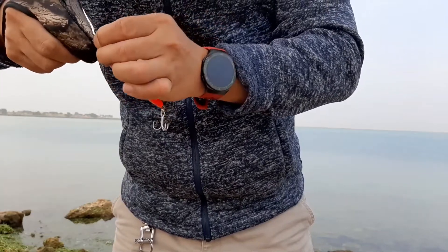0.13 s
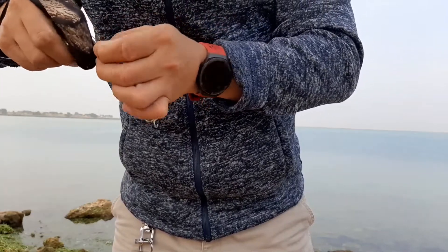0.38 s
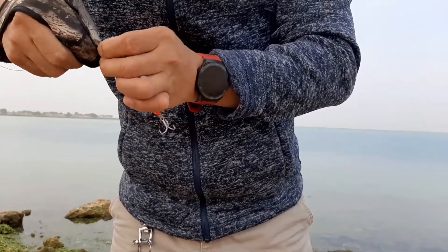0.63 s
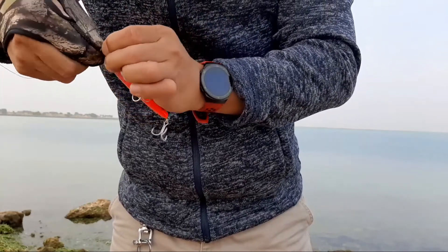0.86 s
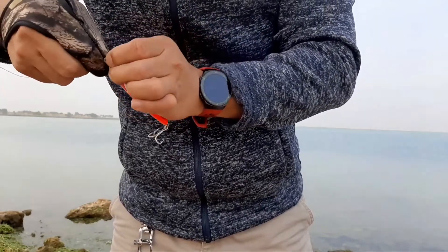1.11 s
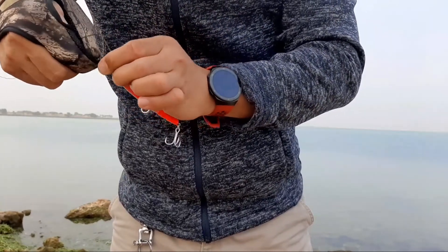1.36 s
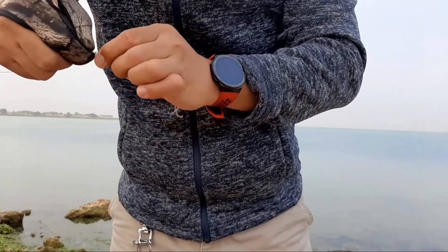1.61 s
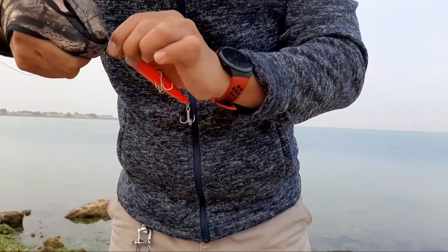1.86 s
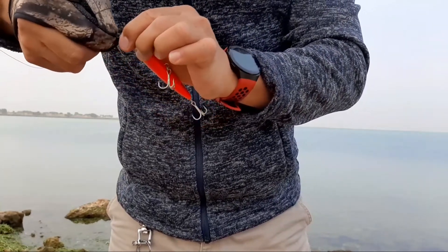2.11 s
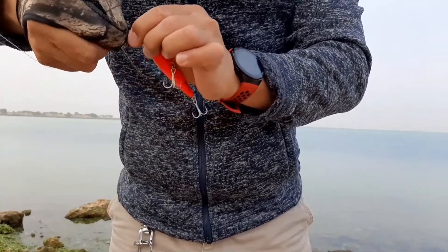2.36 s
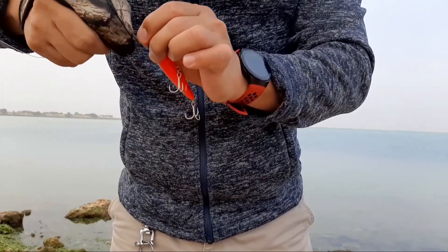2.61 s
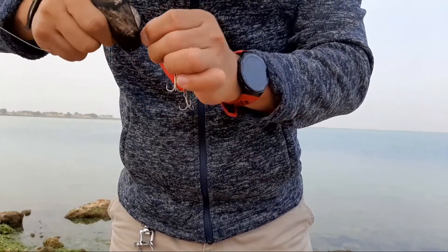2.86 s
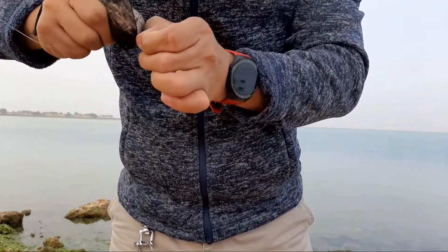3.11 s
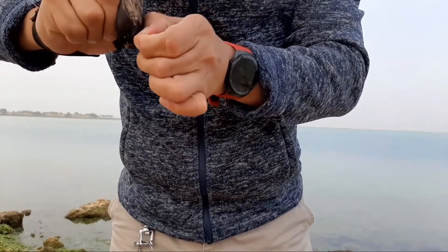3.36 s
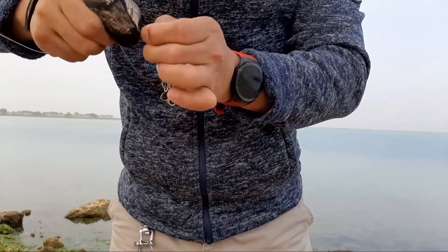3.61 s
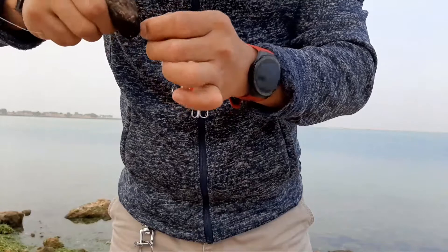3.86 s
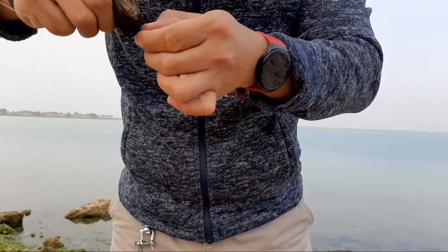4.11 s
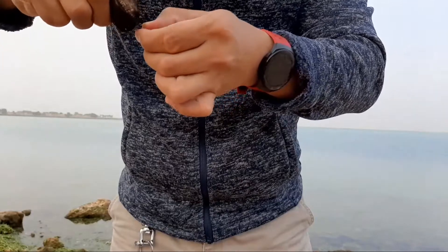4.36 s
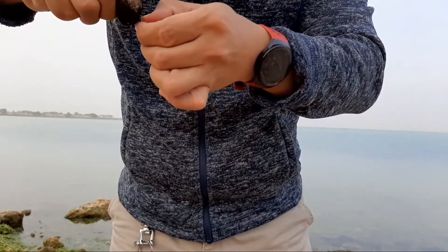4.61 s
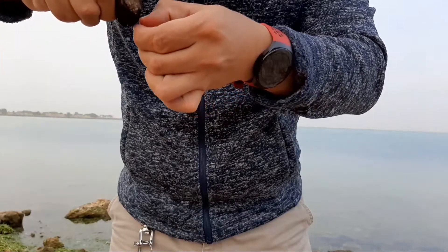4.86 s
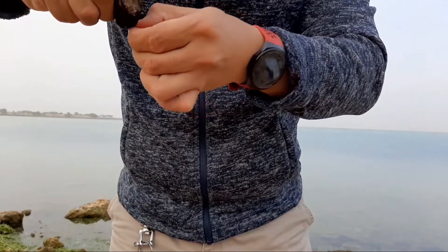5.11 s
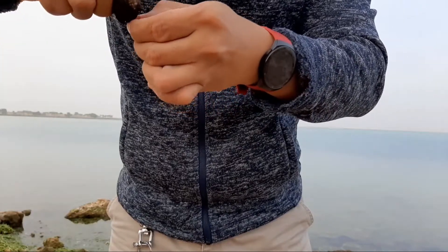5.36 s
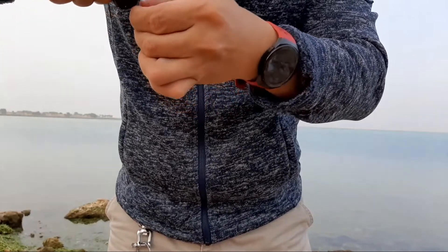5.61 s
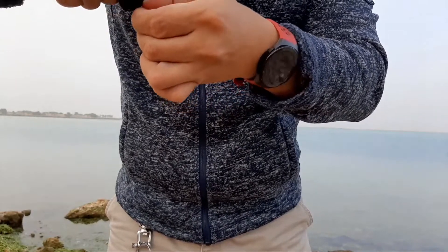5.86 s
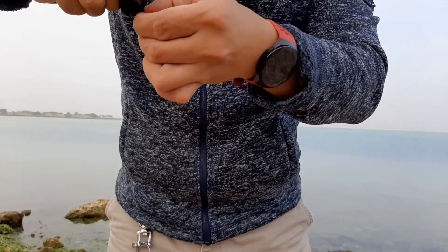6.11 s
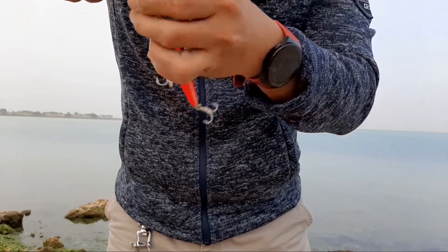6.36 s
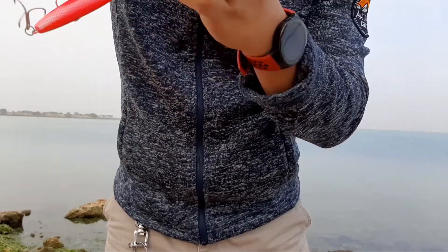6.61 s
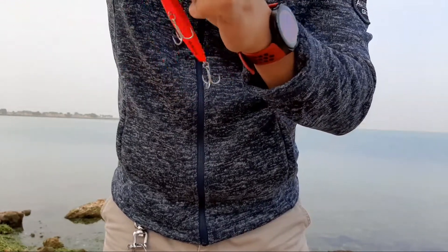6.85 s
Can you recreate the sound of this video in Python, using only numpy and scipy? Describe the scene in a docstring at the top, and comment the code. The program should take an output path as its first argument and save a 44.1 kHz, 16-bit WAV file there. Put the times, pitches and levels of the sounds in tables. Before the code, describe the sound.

An open, quiet shore in stereo, with light steady hiss. At 0 s the tail of a crow's caw ends amid low wind thumps, which continue to about 0.7 s. Raspy, fluttering caws of about 0.3 s follow from the left at 0.5, 1.4, 2.3 and 3.2 s, with a faint short echo; after a gap, duller, quieter ones come at 5.1 and 5.9 s. A distant boat engine hums low, more noticeable after 2.3 s. Close hands on a fishing lure make small bright ticks, clustered around 0.9-1.05 and 1.5-1.9 s, with soft rubs at 0.7 and 1.35. A sharp plastic knock and tick land at 2.95, a crisp double tick at 3.8, and a duller knock at 6.1. From 6.35 to the end near 7 s, metal hooks rattle and scrape brightly, with the strongest wind thump at 6.6.

```python
"""Wind thumping the microphone ports and the tail of a crow's caw come first; six more caws follow from the left.
The voice is a fluttering pulse train through throat resonances, with a faint diffuse echo from the shore.
Puffs are damped swings, mostly in one port, over lumpy rumble; a far boat engine drones as a harmonic series.
Close by, two hands fiddle with a fishing lure: noise impulses ring the hooks as ticks, band noise makes soft rubs,
and dense grains make the final rattle. Steady hiss lies under all."""
import sys
import numpy as np
from scipy import signal
from scipy.fft import rfft, irfft
from scipy.io import wavfile
from scipy.ndimage import uniform_filter1d

SR = 44100
rng = np.random.default_rng(int(sys.argv[2]) if len(sys.argv) > 2 else 0)


def level_to_linear(level):
    """Convert decibel levels to linear amplitude factors, elementwise."""
    exponent = np.asarray(level, float) / 20
    return 10 ** exponent


def persist_wave(psi):
    """Save psi, clipped to +-1, as 16-bit WAV."""
    counts = np.round(np.clip(psi, -1, 1) * 32767).astype(np.int16)
    wavfile.write(sys.argv[1], SR, np.atleast_2d(counts).T)


N = 307818  # length in samples


def evened(x):
    """Power normalisation: scales to rms 1."""
    return x / np.sqrt(np.mean(x ** 2) + 1e-20)


def curve(rows):
    """Linear interpolation: every column after t/s, sample by sample."""
    s, *columns = np.transpose(rows)
    return [np.interp(np.arange(N) / SR, s, c) for c in columns]


def coloured(x, points):
    """Spectral shaping: filters by (f/Hz, level/dB) points joined over log frequency, then rms 1."""
    f, db = np.transpose(points)
    hz = np.fft.rfftfreq(x.shape[-1], 1 / SR)
    gain = level_to_linear(np.interp(np.log(hz + 1), np.log(f), db))
    return evened(irfft(rfft(x) * gain, x.shape[-1]))


def slow(hz, channels=1):
    """Band-limited random modulation: smooth chance up to about hz, rms 1."""
    return coloured(rng.standard_normal((channels, N)), [(hz, 0), (2 * hz, -30), (20 * hz, -120)])


def resonate(x, hz, width):
    """Heterodyned one-pole resonance: near unit gain at a centre that follows the curve hz."""
    turn = np.exp(2j * np.pi * np.cumsum(hz) / SR)
    r = np.exp(-np.pi * width / SR)
    return 2 * (turn * signal.lfilter([1 - r], [1, -r], x / turn)).real


def add(mix, s, sound, pan_db=0., right_lag=0):
    """Stereo localisation: adds a sound at s seconds with a level and a time difference between the ports."""
    for port, (db, lag) in enumerate([(pan_db / 2, 0), (-pan_db / 2, right_lag)]):
        at = round(s * SR) + lag
        part = mix[port, max(at, 0):max(at + len(sound), 0)]
        part += level_to_linear(db) * sound[max(-at, 0):][:len(part)]


# the caws: start t/s, end t/s, relative level/dB, f/Hz at full effort before flutter and sag,
# time scale of the swell/share of the caw, treble level/dB
CAWS = [(-.22, 0.073, -51, 968, .11, -1), (0.506, 0.802, -51, 1051, 0.18, 2.5),
        (1.415, 1.716, -52.5, 1083, .14, 0.7), (2.306, 2.589, -50, 1011, 0.092, 3),
        (3.24, 3.559, -51.5, 1037, .08, -1), (5.099, 5.384, -56, 1008, 0.13, -6),
        (5.908, 6.209, -54, 1020, 0.16, -1.5)]
# resonances of throat and open beak before the beak moves: f/Hz, width/Hz of each of two stages in series,
# level/dB, left minus right level/dB
THROAT = [(830, 930, -60, 7), (1373, 544, 12, 5), (1977, 420, 12.5, 2.5), (3250, 950, -15, 9),
          (3810, 363, -3, 7.5), (5940, 1070, -7, 12), (10700, 500, -36, -26)]


def crow(throb_db=7.5):
    """Source-filter voice: pulses near 1 kHz, pulled flat some 80 times a second into harsh sidebands."""
    ends_db, sink = -18.5, .11  # effort at the ends; time scale of its sinking as a share of the caw
    pitch_per_db, sag, sag_delay = .017, .15, 18.  # shares of pitch; the slower the swell, the later the sag
    flutter_per_s, flutter_slows, flutter_spread = 85., .06, .02  # at the start; share lost by the end; per caw
    flutter_depth, depth_fade = .3, 3.  # share of the pitch; how late the flutter dies away
    jitter, breath, uneven = .011, .36, .55  # pitch tremor, share of air noise, strong-weak contrast
    out, wobble = np.zeros((2, N)), slow(220, channels=3)
    for (start, end, db, pitch_hz, swell, treble_db), (odd,) in zip(CAWS, rng.standard_normal((len(CAWS), 1))):
        share = np.linspace(0, 1, round((end - start) * SR))
        effort_db = ends_db * (np.exp(-share / swell) + np.exp((share - 1) / sink))
        weak = 1 - effort_db / 6  # the voice turns ragged where it is weak
        rough_pitch, rough_flutter, rough_level = wobble[:, round(end * SR):][:, :len(share)]

        per_s = flutter_per_s * (1 - flutter_slows * share + flutter_spread * odd)
        flutter = 2 * np.pi * (np.cumsum(per_s * (1 + 2 * jitter * rough_flutter)) / SR + rng.random())
        dip = (.5 - .5 * np.cos(flutter)) ** 1.3  # the pitch lingers at the top
        depth = flutter_depth * level_to_linear(.5 * effort_db) * (1.1 - share ** depth_fade)
        top_hz = pitch_hz * (1 - sag * share ** (sag_delay * swell) + pitch_per_db * effort_db)
        turns = np.cumsum(top_hz * (1 - depth * dip + jitter * weak * rough_pitch)) / SR

        folds = sum(np.cos(2 * np.pi * k * turns) for k in range(1, 12))
        # alternate pulses differ most at first: lines at half the pitch
        folds *= 1.5 + uneven * (1 - share) * (2.5 + 1.2 * rough_level) * np.cos(np.pi * turns)
        puffs = (0.26 + np.exp(-(turns % 1) / 0.19)) * rng.standard_normal(len(share))
        voice = evened(folds) + breath * np.sqrt(weak) * evened(puffs)
        drive = voice * level_to_linear(throb_db / 2 * np.cos(flutter - .6))

        opening_db = 9.5 * (np.minimum(2 * share, 1) - .8)  # the band near 3.7 kHz grows as the beak opens
        beak = (top_hz / top_hz.max()) ** 0.11 * (1 + 0.055 * share)  # opens with pitch, widens with time
        parts = []
        for k, (hz, width, gain_db, _) in enumerate(THROAT):
            band = resonate(resonate(drive, hz * beak, width), hz * beak, width)
            band_db = gain_db + treble_db * (hz > 3300) + opening_db * (3300 < hz < 4500)
            parts.append((-1) ** k * level_to_linear(band_db) * band)
        # effort sets the loudness at any pitch
        loud = np.sqrt(uniform_filter1d(sum(parts) ** 2, size=1600) + 1e-9)
        level = level_to_linear(db + 3.0 + effort_db) / loud * signal.windows.tukey(len(share), .2)
        for part, (*_, pan_db) in zip(parts, THROAT):
            add(out, start, level * part, pan_db, right_lag=18)
    return out


def shore(x):
    """Diffuse reflection: rocks and water return a short decaying tail, different in each port."""
    t = np.arange(SR // 4) / SR
    tail = rng.standard_normal((2, len(t))) * level_to_linear(-60 * t / .3) * (t > .006)
    return signal.oaconvolve(x.mean(0)[None], tail / np.linalg.norm(tail[0]), axes=1)[:, :N]


# strong puffs of wind: t/s, nominal peak level/dB, time scale/s, port (1 left, -1 right)
PUFFS = [(0.038, -20.5, 0.022, 1), (0.227, -26, 0.02, -1), (0.302, -22.5, 0.04, -1),
         (0.346, -20, 0.026, -1), (0.375, -24.5, 0.02, 1), (0.531, -22.5, 0.031, 1),
         (0.595, -18.5, 0.02, 1), (0.659, -27.5, 0.022, 1), (1.922, -29.5, 0.016, 1),
         (2.171, -26.5, 0.018, 1), (2.253, -24.5, 0.019, 1), (2.29, -30, 0.011, -1),
         (2.408, -26, 0.019, -1), (2.444, -26.5, 0.021, -1), (2.733, -25.5, 0.028, 1),
         (2.756, -25.5, 0.012, -1), (3.173, -25.5, 0.02, 1), (3.207, -25, 0.022, 1),
         (3.695, -30.5, 0.025, 1), (3.838, -30.5, 0.025, -1), (3.948, -31.5, 0.02, 1),
         (4.056, -23.5, 0.022, 1), (4.746, -30, 0.019, 1), (5.362, -28, 0.02, -1), (5.401, -23, 0.031, 1),
         (5.676, -29.5, 0.055, -1), (5.736, -28, 0.046, 1), (5.906, -25.5, 0.016, -1),
         (6.067, -22, 0.024, 1), (6.171, -27, 0.036, -1), (6.204, -26, 0.024, 1), (6.306, -25.5, 0.015, -1),
         (6.401, -17.5, 0.051, 1), (6.433, -28, 0.032, -1), (6.558, -30, 0.038, -1), (6.598, -17, 0.013, 1),
         (6.617, -8.5, 0.018, 1), (6.652, -19, 0.014, 1), (6.912, -27.5, 0.016, 1), (6.95, -21, 0.021, 1)]
# rumble beneath the puffs, before its lumps: t/s, left level/dB, right level/dB
WIND = [(0.0, -25, -38), (.07, -32, -36), (0.2, -50, -33), (0.5, -36, -46), (0.8, -46, -60),
        (1.0, -57, -47), (1.6, -48, -62), (1.85, -56, -66), (2.3, -44, -40), (2.6, -43, -44),
        (3.0, -51, -53), (3.25, -43, -44), (3.6, -47, -54), (4.0, -43, -43), (4.4, -50, -58),
        (5.1, -50, -58), (5.5, -46, -46), (6.2, -45, -44), (6.5, -31, -32), (6.75, -45, -52),
        (6.98, -40, -62)]
# relative spectrum of wind turbulence: f/Hz, level/dB per Hz
RUMBLE = [(15, -73), (25, -8.5), (65, 7), (113, 3.5), (313, -28), (412, -30), (551, -36), (726, -46),
          (1200, -66), (1560, -72), (2640, -120)]


def wind(spray=0.58, kink=0.074, leak_db=-21.0):
    """Damped oscillation: each puff swings mostly one port's diaphragm a few cycles, over lumpy turbulence."""
    lumps_db = 4.  # rms of the level swings: the lesser puffs
    rumble = coloured(rng.standard_normal((2, N)), RUMBLE)
    out = rumble * level_to_linear(np.array(curve(WIND)) + lumps_db * slow(18.7, channels=2))
    turbulence = coloured(rng.standard_normal((len(PUFFS), SR // 2)), RUMBLE)
    for (s, db, length, side), (phase, odd), eddies in zip(PUFFS, rng.random((len(PUFFS), 2)), turbulence):
        hz = 90.55 * (1 + 0.077 * (2 * odd - 1)) + 1.88 * (db + 27)  # strong puffs swing faster
        t = np.arange(-2 * length, 3 * length, 1 / SR)
        rise = 0.5 * level_to_linear(-.25 * (db + 28))  # strong puffs strike more suddenly
        shape = np.exp(-abs(t / np.where(t < 0, rise * length, 0.56 * length)) ** 0.9)
        swing = np.cos(2 * np.pi * (hz * t * (1 - 3 * t) + phase))  # slows as it goes
        # strong swings are lopsided: an overtone and a brighter rush that grow with the puff
        overtone = np.cos(4 * np.pi * (hz * t + phase))
        rush = .5 * evened(np.gradient(eddies))[:len(t)]
        swing = swing + kink * (overtone + rush) * level_to_linear(.5 * (db + 16.5)) + spray * eddies[:len(t)]
        add(out, s + t[0], level_to_linear(db + leak_db / 2) * shape * swing, -np.sign(side) * leak_db)
    return out


# engine level, before panning: t/s, level/dB
ENGINE = [(0, -54), (.8, -55.5), (1.5, -61), (2.1, -53.5), (2.4, -49), (3.3, -46.5), (4.5, -50.5),
          (5.2, -48.5), (6.98, -46.5)]
# harmonics, before brightness and waver: multiple of the firing rate, relative level/dB
ORDER = [(1, -7), (2, -8.5), (3, -28.5), (4, -9.5), (5, -13), (6, -23), (7, -31), (8, -39.5)]
# relative spectrum of the exhaust wash: f/Hz, level/dB per Hz
WASH = [(120, -15.5), (200, -21), (300, 5.5), (420, 4.5), (550, -15), (750, -20), (1100, -41)]


def engine(waver_db=1.7, drift=0.00453):
    """Harmonic series: orders of the firing rate waver on the way over the water; exhaust wash throbs along."""
    firing_hz, wash_db = 77.07, -17.5
    bright_db, dull_db, dulling_s = 13., -2, 2.28  # per order from 5th to 7th: at first, at last; time constant
    level_db = curve(ENGINE)[0]
    tilt_db = dull_db + (bright_db - dull_db) * np.exp(-np.arange(N) / SR / dulling_s)
    turns = np.cumsum(firing_hz * (1 + drift * slow(1.517)[0])) / SR
    waver, phase = slow(3.1, channels=len(ORDER)), rng.random(len(ORDER))
    drone = np.zeros(N)
    for (k, db), w, p in zip(ORDER, waver, phase):
        order_db = db + np.clip(k - 5, 0, 2) * tilt_db + waver_db * w
        drone += level_to_linear(order_db) * np.cos(2 * np.pi * (round(k) * turns + p))
    noise = rng.standard_normal((3, N))  # one shared noise, one for each port
    wash = coloured(noise[0] + 0.84 * noise[1:], WASH) * (1 + 0.33 * np.cos(2 * np.pi * turns))
    out = level_to_linear(level_db + wash_db) * wash
    add(out, 0, level_to_linear(level_db) * drone, 2.5, right_lag=18)
    return out


# relative spectrum of sea hiss and microphone noise: f/Hz, level/dB
AIR = [(470, -4), (800, -3.5), (2380, -5.5), (3420, -10), (4130, -8), (8440, -14.5), (14800, -5.5),
       (16000, -18.5)]


def air():
    """Uncorrelated noise: independent hiss in the two ports, swelling a little and easing off at first."""
    easing_db = np.interp(np.arange(N) / SR, [.1, 2.5, 4.5], [2.5, .8, -.8])
    level_db = -78.5 + 0.72 * slow(3.3) + easing_db + [[.7], [-.7]]
    return level_to_linear(level_db) * coloured(rng.standard_normal((2, N)), AIR)


# ringing modes of the hooks: f/Hz, relative level/dB, decay by 60 dB/s
HOOKS = [(4680, -22.5, .06), (5740, -6.5, 0.091), (7100, -4, .12), (7740, -9, .1), (11100, -8, 0.06)]


def ring(clicks, share):
    """Modal synthesis: adds the decaying modes of the hooks to a train of clicks."""
    t = np.arange(SR // 5) / SR
    modes = sum(level_to_linear(db - 60 * t / t60) * np.sin(2 * np.pi * hz * t) for hz, db, t60 in HOOKS)
    return clicks + share * signal.oaconvolve(clicks, modes)[:len(clicks)]


# ticks of hooks, rings and line, before port gains: t/s, peak level/dB, brightest f/Hz
TICKS = [(0.0859, -51, 7350), (0.2164, -56, 7270), (0.4566, -50.5, 12600), (0.702, -50.5, 7040),
         (0.8592, -47, 7570), (0.9183, -54.5, 8600), (1.0053, -51, 12900), (1.0261, -46, 12400),
         (1.046, -43.5, 6970), (1.495, -56, 6560), (1.5924, -49.5, 6790), (1.665, -48.5, 7400),
         (1.722, -49.5, 7900), (1.731, -42, 7700), (1.905, -48.5, 11700), (2.136, -47, 8100),
         (2.9302, -52.5, 7490), (2.9643, -35.5, 6950), (2.9699, -46.5, 8500), (3.8177, -41, 15400),
         (3.8283, -42, 14700), (3.982, -52, 6330), (4.0438, -55, 7600), (6.339, -51, 7710),
         (6.3596, -49, 12350), (6.3894, -60, 11400), (6.3975, -40.5, 10700), (6.422, -34, 13600),
         (6.4306, -37, 6960), (6.503, -35, 12700), (6.5336, -34, 11100), (6.5729, -34.5, 11950),
         (6.595, -43.5, 9900), (6.6215, -40.5, 11630), (6.6323, -48, 10400), (6.66, -38, 9500),
         (6.6728, -33, 11780), (6.7385, -44, 7500), (6.759, -48, 12400), (6.8102, -46.5, 11250),
         (6.8272, -46, 9900), (6.839, -35.5, 15000), (6.8536, -34, 8570), (6.8796, -39, 7460),
         (6.9094, -37.5, 11050), (6.9238, -33, 11240)]
# knocks on the plastic lure, before port gains: t/s, peak level/dB, brightest f/Hz
KNOCKS = [(2.4001, -40, 6500), (2.9539, -30.5, 9350), (4.5841, -50.5, 5170), (6.1186, -35.5, 5300)]


def ticks(snap_s=0.00053, scratch_db=-12.5, width=0.5):
    """Impact excitation: a half-millisecond snap and short scratch, bright-banded over a dull plastic body."""
    tick_body_db, knock_body_db, scratch_t60_s = -22.5, 5.5, .04
    faint_count, faint_db = 10, -67  # least level of the faint ticks at chance times
    out, t = np.zeros((2, N)), np.arange(4096) / SR
    hz = np.fft.rfftfreq(len(t), 1 / SR) + 1
    since = t - .003
    faint = [(.1 + (N / SR - .2) * when, faint_db + 6 * size, 7000 * (1 + .15 * hue))
             for when, size, hue in rng.random((faint_count, 3))]
    rows = [(*row, knock_body_db) for row in KNOCKS] + [(*row, tick_body_db) for row in [*TICKS, *faint]]
    for (s, db, bright_hz, body_db), noise in zip(rows, rng.standard_normal((len(rows), 3, len(t)))):
        # the scratch builds just before the slip
        scratch = level_to_linear(scratch_db - 60 * np.where(since < 0, -since / 0.0012, since / scratch_t60_s))
        shape = np.exp(-abs(since) / np.where(since < 0, 0.24 * snap_s, snap_s)) + scratch
        colour = 0.081 * hz ** 2 / (hz ** 2 + 5000 ** 2) + np.exp(-(np.log(hz / bright_hz) / width) ** 2)
        colour += level_to_linear(body_db) * np.exp(-(np.log(hz / 2600) / 0.68) ** 2)
        for port in range(2):  # the hands are on the left and shade the two ports differently
            struck = ring((noise[2] + 1.5 * noise[port]) * shape, .004)
            tick = irfft(rfft(struck) * colour)
            at = round((s - .003) * SR) + 6 * port
            out[port, at:at + len(t)] += level_to_linear(db + 4.5 - 7.1 * port) * (tick / abs(tick).max())[:N - at]
    return out


# soft rubs: t/s, length/s, rms level/dB before fades and panning, centre f/Hz
SCUFFS = [(0.198, 0.39, -84.5, 6950), (0.694, 0.066, -71.5, 10400), (1.342, 0.043, -70, 5230),
          (2.975, 0.073, -82, 9250), (4.029, 0.13, -81, 5860)]


def scuffs():
    """Friction noise: soft rubs of line and fingers in a broad resonant band that swells and fades."""
    out = np.zeros((2, N))
    for s, length, db, hz in SCUFFS:
        band = np.full(round(length * SR), hz)
        rub = resonate(resonate(rng.standard_normal(len(band)), band, 0.5 * hz), band, 0.5 * hz)
        add(out, s, level_to_linear(db) * evened(rub) * signal.windows.tukey(len(rub), .6), 6., right_lag=6)
    return out


# rattle level, before clumps and port gains: t/s, level/dB
RATTLE = [(6.335, -65.5), (6.375, -55), (6.39, -47), (6.43, -50.5), (6.47, -58), (6.55, -52.5),
          (6.585, -64), (6.68, -61.5), (6.72, -70), (6.81, -75.5), (6.84, -67.5), (6.93, -57), (6.98, -65)]
# relative spectrum of the scraping: f/Hz, level/dB per Hz
SCRAPE = [(600, -17), (1500, -12), (2400, -6), (3800, -5.5), (5900, 2.5), (8500, -8.5), (11100, 2),
          (13800, -1.5), (16000, -17)]


def rattle(per_s=1800, spread_db=4.5):
    """Granular friction: dense impulses in clumps as hooks and rings drag over plastic and skin."""
    grains = level_to_linear(spread_db * np.minimum(rng.exponential(1, (3, N)), 5)) * (rng.random((3, N)) < per_s / SR)
    grains *= rng.choice([-1, 1], (3, N))
    left = ring(grains[2] + grains[0], 0.0036)
    right = ring(np.roll(grains[2], 6) + grains[1], 0.014)  # shared grains arrive later on the right
    on = np.arange(N) / SR > RATTLE[0][0]
    clumps_db = 2.7 * slow(64)
    level_db = curve(RATTLE)[0] + clumps_db + [[1.5], [-2.5]]
    return on * coloured(np.array([left, right]), SCRAPE) * level_to_linear(level_db)


def scene():
    """Linear superposition: all sources add at the two ports."""
    bird = crow()
    echo = level_to_linear(-14) * shore(bird)
    return bird + echo + wind() + engine() + air() + ticks() + scuffs() + rattle()


def low_pass(x):
    """Removes everything above the highest recorded frequency."""
    return signal.sosfilt(signal.butter(12, 16500, fs=SR, output="sos"), x)


def record(dry):
    """High-pass filtering: a fourth-order slope at 41 Hz cuts the deepest bass."""
    mix = signal.sosfilt(signal.butter(4, 41, "highpass", fs=SR, output="sos"), dry)
    return low_pass(mix)


dry = scene()
out = record(dry)
persist_wave(out)
```